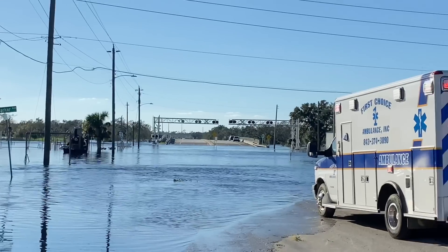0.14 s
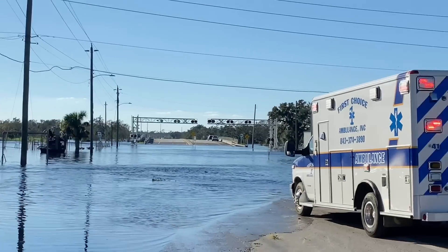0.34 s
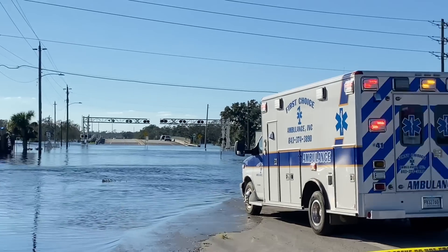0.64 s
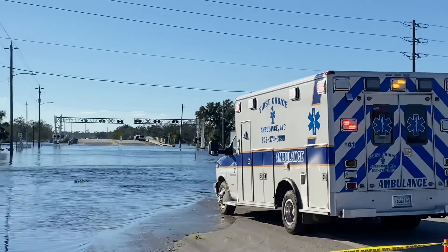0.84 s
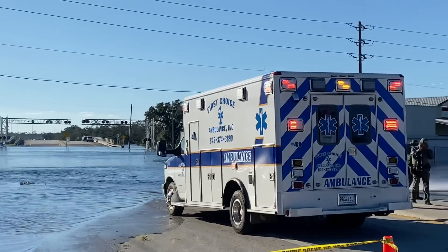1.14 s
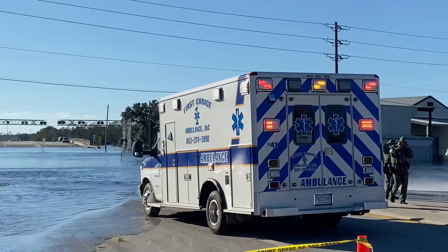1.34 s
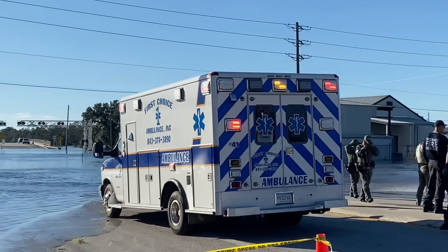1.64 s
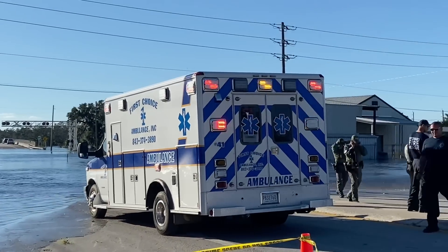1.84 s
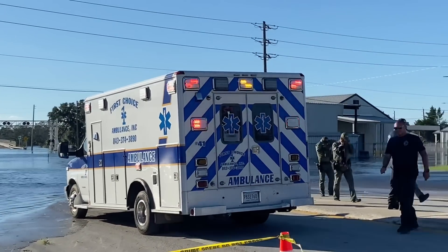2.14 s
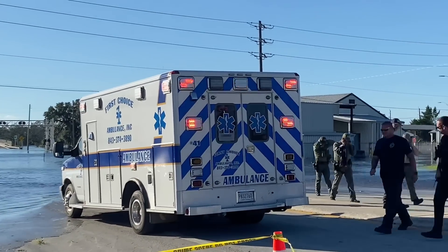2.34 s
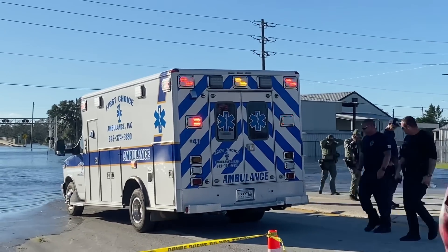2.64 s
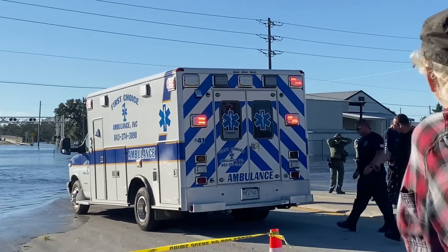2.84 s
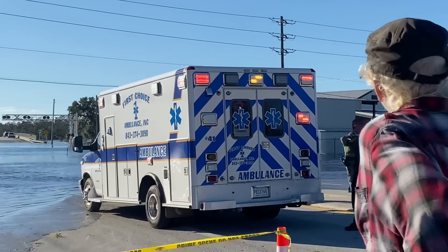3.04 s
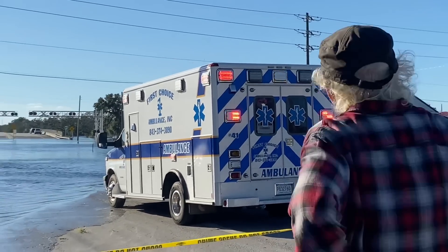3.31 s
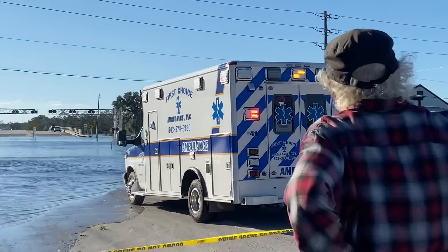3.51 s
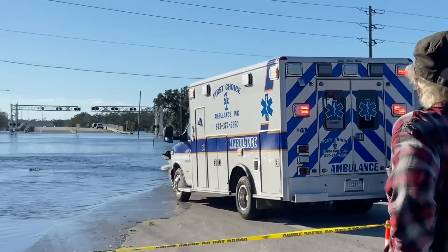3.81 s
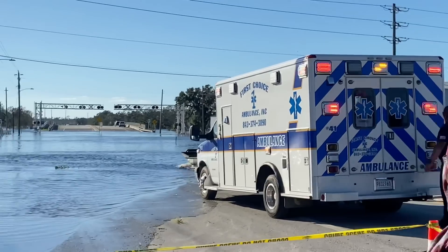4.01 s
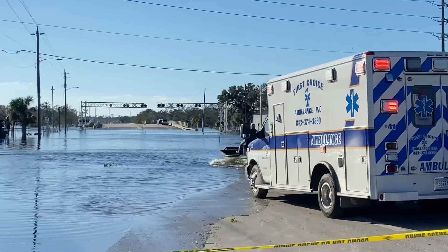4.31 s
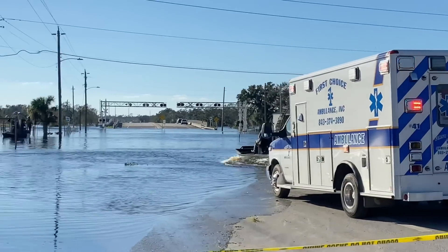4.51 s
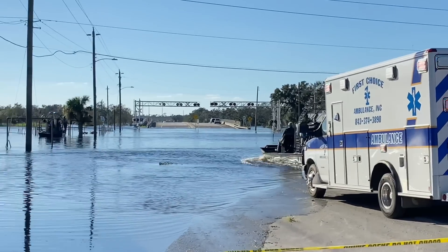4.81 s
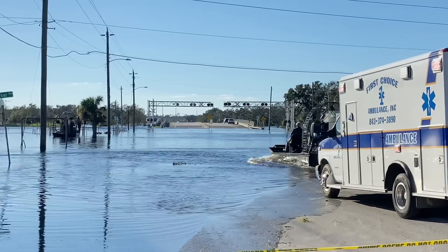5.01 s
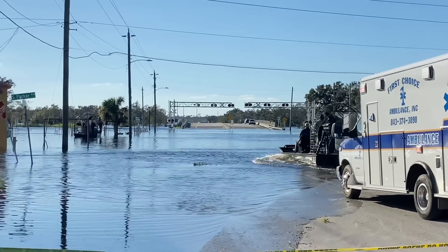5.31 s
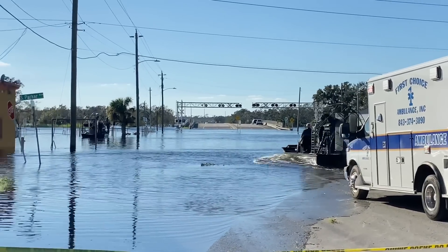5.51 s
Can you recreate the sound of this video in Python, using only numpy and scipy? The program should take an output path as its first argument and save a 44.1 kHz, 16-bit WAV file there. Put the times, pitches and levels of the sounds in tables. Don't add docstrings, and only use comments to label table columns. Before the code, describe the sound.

Continuous airboat noise across a flooded street: uneven exhaust pulses blend into a dense buzzing drone, swelling and rising at first, holding at full power, sagging a little in pitch near three seconds, then running steadily as the boat pushes off. Broad air roar and fine spray hiss surround it, with hiss growing a bit at the end. Camera stereo microphones, outdoors, slightly diffuse and wide.

```python
import sys
import numpy as np
from scipy import signal
from scipy.fft import rfft, irfft, next_fast_len
from scipy.io import wavfile
from scipy.ndimage import uniform_filter1d

SR = 44100
rng = np.random.default_rng(int(sys.argv[2]) if len(sys.argv) > 2 else 0)


def dump(signal):
    limited = np.clip(np.atleast_2d(signal).T, -1, 1)
    pcm = np.round(limited * 32767).astype(np.int16)
    wavfile.write(sys.argv[1], SR, pcm)


def to_linear_factor(level_db):
    exponent = np.asarray(level_db, float) / 20
    return 10 ** exponent


N = 249606
HOP = 128

UP_TO_SPEED_S, SWING_S, PUSH_OFF_S = (0.21, 1), (1.93, 2.49), (2.954, 3.44)

# time in seconds, engine cycles in Hz.
ENGINE_SPEED = [(0.0, 23.36), (0.14, 24.2), (0.53, 30.28), (0.66, 31.85), (0.82, 33.35), (1.02, 34.6),
                (1.29, 34.57), (1.8, 33.61), (2.19, 33.96), (2.3, 33.85), (2.66, 33.12), (2.92, 31.8),
                (3.18, 31.53), (3.41, 31.2), (3.97, 31.83), (5.0, 31.56), (5.36, 31.74), (5.66, 32.18)]
# time in seconds, level in dB.
THRUST = [(0.0, -33), (0.03, -33.5), (0.3, -32.5), (0.61, -30), (1.12, -31), (1.23, -32.5), (1.75, -34.5),
          (2.35, -32), (2.38, -33), (3.59, -38.5), (4.21, -36), (4.96, -35.5), (5.63, -32.5), (5.66, -29.5)]
THRUST_MID_DB = -33

# dB per dB of thrust, then offset in dB in each of the four states.
WASH_LAYERS = [
    (0.36, -17.5, -24, -28, -28),
    (0.93, -37.5, -29, -28.5, -24.5),
    (1.1, -24.5, -23.5, -26, -27),
    (1.15, -33.5, -30.5, -32.5, -32),
    (0.12, 1.8, 0.8, -.8, 2),
]
# frequency in Hz, density in dB per Hz.
RUMBLE_SPECTRUM = [(25, -42), (45, 5), (70, 7), (130, 0.5), (220, -5.5), (350, -17), (800, -86)]
# frequency in Hz, density in dB per Hz.
BODY_SPECTRUM = [(50, -73), (150, -33), (250, -0.5), (400, 0.5), (550, -2), (750, -6), (1100, -17),
                 (2500, -80)]
# frequency in Hz, density in dB per Hz.
ROAR_SPECTRUM = [(350, 5), (600, -1), (691, -3), (739, -3.5), (831, -3.5), (900, -3), (1040, 1), (1140, -3),
                 (1540, -3.5), (2600, -23), (3380, -55), (5720, -120)]
# frequency in Hz, density in dB per Hz.
HISS_SPECTRUM = [(500, -66), (1300, -14), (2200, -1), (2700, -3), (4300, -3.5), (6500, -8.5),
                 (9000, -11), (12000, -11.5), (13500, -13), (14700, -16), (15700, -19.5)]
# time in seconds, frequency in Hz.
ROAR_TOP = [(0, 1180), (.3, 1420), (.7, 1770), (1.5, 1890), (2.6, 2096), (3.1, 1793), (3.6, 1694),
            (4.5, 1930), (5.66, 2550)]
MIST_HZ = 5960

# frequency in Hz, side minus mid in dB.
WIDTH = [(60, -23), (110, -20), (200, -19.5), (380, -6.5), (700, -5), (1300, -4.5), (1900, -5.5),
         (2300, -31), (16000, -22)]
# time in seconds, scattered share of each tone (0 to 1).
UNSTEADY = [(0, 0.62), (.35, 0.49), (.7, 0.53), (1.1, 0.28), (2.5, 0.31), (3.5, 0.2), (5.66, .2)]
PORT_START_HZ, PORT_TURN_HZ = 7100, 4150

GEAR = 2.23
# multiple of the blade pass, level in dB in each of the four states.
BLADE_TONES = [(1, -21, -17.5, -20, -25), (2, -20.5, -36, -39, -43), (3, -26, -46, -30, -28)]

FIRING_EIGHTHS = 0, 3, 5, 6
# multiple of the cycle, level in dB in each of the four states.
HUM_TONES = [(5, -25, -20.5, -12, -12), (20, -37, -32, -40.5, -41.5), (24, -45, -37.5, -47, -43.5)]
# multiple of the cycle, level in dB in each of the four states.
STRONG_TONES = [(3, -23, -17.5, -24.5, -23.5), (8, -21, -26.5, -26, -23), (9, -29, -27.5, -27, -28),
                (11, -21, -26.5, -29, -26.5)]
# multiple of the cycle, level in dB in each of the four states.
WEAK_TONES = [(6, -36.5, -29.5, -24, -36), (7, -36, -64, -44, -34), (10, -33, -27, -43.5, -51),
              (12, -30, -38, -41, -37), (14, -27, -28, -38, -40), (15, -50, -35, -38, -39),
              (18, -48, -36, -36, -29), (19, -32.5, -44, -33, -41), (21, -33, -51, -42, -53),
              (22, -36, -35.5, -47, -40.5), (25, -59.5, -43, -58, -47), (26, -44, -45, -55, -48.5),
              (30, -55, -37, -52, -66), (31, -42, -53, -63, -52), (32, -65, -52, -46, -43)]
# multiple of the cycle, level in dB in each of the four states.
WAVERING_TONES = [(13, -26, -26.5, -41, -26), (16, -31.5, -26, -30, -31), (17, -35, -26.5, -33, -32.5)]
RASP_DB = -23, -21, -20, -21.5
# frequency in Hz, width in Hz, lift in dB.
PIPE = [(135.3, 21.2, 8), (188.6, 18.6, 5.5), (217, 45, -3.5), (277, 28.6, 9.5), (444, 50, -4),
        (559.9, 16, -0.5), (828, 19, 8.5), (1061, 45, 7.5), (1289, 37, 5), (1586, 29, 6), (1810, 24, 3.5)]
RING_PER_DB = 0.17
BAND_EDGE_HZ = 15760


def evened(x):
    return x / np.sqrt(np.mean(abs(x) ** 2) + 1e-20)


def read(points, hz):
    f, value = np.transpose(points)
    return np.interp(np.log(hz + 1), np.log(f + 1), value)


def curves(rows, t):
    s, *columns = np.transpose(rows)
    return [np.interp(t, s, c) for c in columns]


def slow_times():
    return np.arange(N // HOP + 2) * HOP / SR


def drift(rate_hz):
    steps = next_fast_len(N // HOP + 2)
    z = rng.standard_normal((2, steps))
    smooth = np.exp(-(np.fft.fftfreq(steps, HOP / SR) / rate_hz) ** 2)
    re, im = np.fft.ifft(np.fft.fft(z) * smooth).real
    return evened(re + 1j * im)[:N // HOP + 2]


def by_state(state_db, t):
    up, swing, off = (np.interp(t, span, (0, 1)) for span in (UP_TO_SPEED_S, SWING_S, PUSH_OFF_S))
    shares = [1 - up, up - swing, swing - off, off]
    return 10 * np.log10(to_linear_factor(2 * np.array(state_db)) @ shares)


def wash_db(t):
    thrust = curves(THRUST, t)[0] - THRUST_MID_DB
    return [share * thrust + by_state(db, t) for share, *db in WASH_LAYERS]


def turbulence(shape, level_db, patchy_db, flicker_db, top_hz=None):
    frames, hz = N // HOP + 5, np.fft.rfftfreq(512, 1 / SR)
    a, b, c, d, patches = rng.standard_normal((frames, 257, 5)).T
    patches = evened(uniform_filter1d(uniform_filter1d(patches, 5, 0), 24, 1))
    flicker = evened(uniform_filter1d(rng.standard_normal(frames), 6))
    field = to_linear_factor(patchy_db * patches + flicker_db * flicker)
    if top_hz:
        u = hz[:, None] / curves(top_hz, np.arange(frames) * HOP / SR)[0]
        hump = .55 * np.exp(-((u - .85) / .1) ** 2)
        field = field * (.25 + 1 / np.sqrt(1 + u ** 8) + hump)
    flat = signal.istft(np.array([a + 1j * b, c + 1j * d]) * field, nperseg=512, noverlap=384)[1]
    size = next_fast_len(flat.shape[1], True)
    fine_hz = np.fft.rfftfreq(size, 1 / SR)
    direct, scattered = rfft(flat, size) * to_linear_factor(read(shape, fine_hz))
    half_lag = np.pi * np.maximum(fine_hz - PORT_START_HZ, 0) / PORT_TURN_HZ
    alike = .65
    side = -1j * np.sin(half_lag) * (alike * direct + np.sqrt(1 - alike ** 2) * scattered)
    side += to_linear_factor(read(WIDTH, fine_hz)) * scattered
    out = irfft([np.cos(half_lag) * direct, side], size)[:, :N]
    return to_linear_factor(level_db) * out / np.std(out[0])


def wash():
    t = np.arange(N) / SR
    rumble_db, body_db, roar_db, hiss_db, mist_db = wash_db(t)
    turns = np.cumsum(curves(ENGINE_SPEED, t)[0]) / SR
    throb = 1 + 0.29 * np.cos(2 * np.pi * turns) + 0.28 * np.cos(2 * np.pi * GEAR * turns)
    rumble = turbulence(RUMBLE_SPECTRUM, rumble_db, patchy_db=0.0, flicker_db=-1.8)
    body = turbulence(BODY_SPECTRUM, body_db, patchy_db=2.5, flicker_db=0.7) * throb
    roar = turbulence(ROAR_SPECTRUM, roar_db + 0.37, patchy_db=2.0, flicker_db=1.3, top_hz=ROAR_TOP) * throb
    hiss = turbulence(HISS_SPECTRUM, hiss_db + 1.2, patchy_db=1.0, flicker_db=.2)
    high_pass = signal.firwin(63, MIST_HZ, pass_zero=False, fs=SR)
    mist = signal.oaconvolve(hiss, high_pass[None], "same")
    return rumble + body + roar + hiss + (to_linear_factor(mist_db) - 1) * mist


def lift_db(hz):
    return sum(db / (1 + (2 * (hz - top_hz) / width) ** 2) for top_hz, width, db in PIPE)


def tones(multiples, levels_db, rough, drift_hz):
    slow, t = slow_times(), np.arange(N // 8 + 1) * 8 / SR
    turns = np.cumsum(curves(ENGINE_SPEED, t)[0]) * 8 / SR
    mean_hz = turns[-1] / t[-1]
    scatter = rough * curves(UNSTEADY, slow)[0]
    out = np.zeros((2, len(t)))
    for k, db in zip(multiples, levels_db):
        share = np.clip(scatter * np.sqrt(k / 8), 0, .95)
        mid = np.sqrt(1 - share ** 2) + share * drift(drift_hz)
        side = to_linear_factor(read(WIDTH, k * mean_hz) - 3.0) * drift(2.34)
        start = np.angle(np.exp(-2j * np.pi * k * np.array(FIRING_EIGHTHS) / 8).sum())
        carrier = np.exp(2j * np.pi * k * turns + 1j * (start + 0.62 * rng.standard_normal()))
        for channel, path in zip(out, (mid, side)):
            channel += (np.interp(t, slow, np.sqrt(2) * to_linear_factor(db) * path) * carrier).real
    return signal.resample_poly(out, up=8, down=1, axis=1)[:, :N]


def stack(rows, rough, drift_hz, fading_db, gear=1):
    slow = slow_times()
    cycle_hz = curves(ENGINE_SPEED, slow)[0]
    ring = 1 + RING_PER_DB * np.maximum(curves(THRUST, slow)[0] - THRUST_MID_DB, -1)
    multiples = [gear * round(row[0]) for row in rows]
    levels = []
    for k, row in zip(multiples, rows):
        fading = fading_db * np.sqrt(2) * drift(1.56).real
        levels.append(by_state(row[1:], slow) + ring * lift_db(k * cycle_hz) + fading)
    return tones(multiples, levels, rough, drift_hz)


def propeller():
    return stack(BLADE_TONES, rough=1.65, drift_hz=11.0, fading_db=1.0, gear=GEAR)


def rasp():
    slow = slow_times()
    cycle_hz = curves(ENGINE_SPEED, slow)[0]
    top_hz = curves(ROAR_TOP, slow)[0]
    base_db = wash_db(slow)[2] + by_state(RASP_DB, slow)
    multiples = np.arange(33, 64)
    levels = []
    for k in multiples:
        u = k * cycle_hz / top_hz
        fade_db = 1.7 * np.exp(-((u - .85) / 0.02) ** 2) - 10 * np.log10(1 + u ** 8)
        levels.append(base_db + lift_db(k * cycle_hz) + fade_db + 1.43 * rng.standard_normal())
    return tones(multiples, levels, rough=2.5, drift_hz=8.0)


def exhaust():
    out = stack(HUM_TONES, rough=0.53, drift_hz=7.6, fading_db=.4)
    out += stack(STRONG_TONES, rough=0.93, drift_hz=7.1, fading_db=1.44)
    out += stack(WEAK_TONES, rough=1.9, drift_hz=8.0, fading_db=1.8)
    out += stack(WAVERING_TONES, rough=1.62, drift_hz=9.1, fading_db=2.0)
    return out + rasp()


def scene():
    mid, side = wash() + propeller() + exhaust()
    return np.array([mid + side, mid - side])


def joint_stereo(x, weaker_db):
    hz, _, z = signal.stft([x[0] + x[1], x[0] - x[1]], SR, nperseg=2048)
    band_power = np.add.reduceat(abs(z) ** 2, np.arange(0, 1025, 16), axis=1)
    power = np.repeat(band_power, 16, axis=1)[:, :1025]
    kept = (power > to_linear_factor(2 * weaker_db) * power[::-1]) | (hz[:, None] < 2050)
    z = z * kept * (hz[:, None] < BAND_EDGE_HZ)
    mid, side = signal.istft(z, SR, nperseg=2048)[1][:, :N]
    return np.array([mid + side, mid - side]) / 2


def low_pass(x):
    return signal.sosfilt(signal.butter(12, 16550, fs=SR, output="sos"), x)


def record(dry):
    knee, top = .7, .95
    over = np.maximum(abs(dry) - knee, 0)
    limited = dry - np.sign(dry) * (over - (top - knee) * np.tanh(over / (top - knee)))
    thinned = joint_stereo(limited, weaker_db=-10)
    return low_pass(thinned)


dry = scene()
out = record(dry)
dump(out)
```